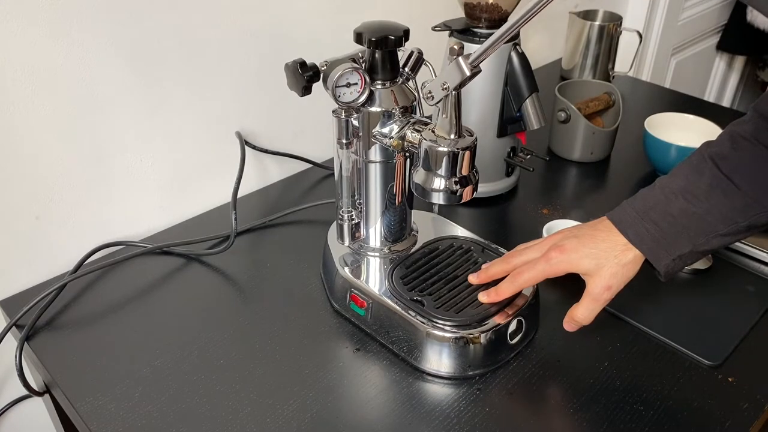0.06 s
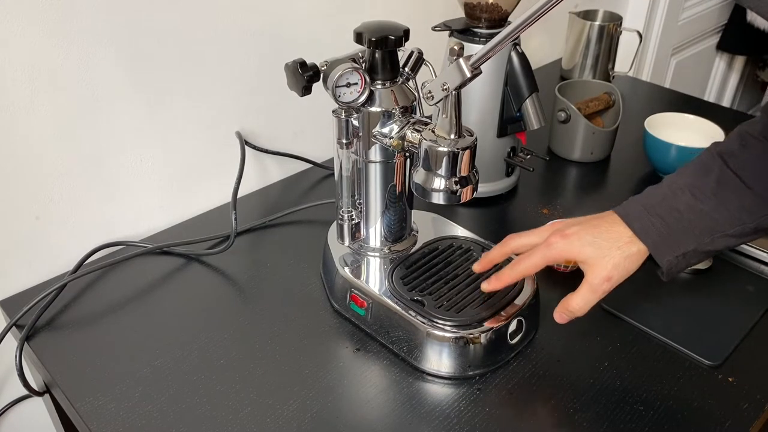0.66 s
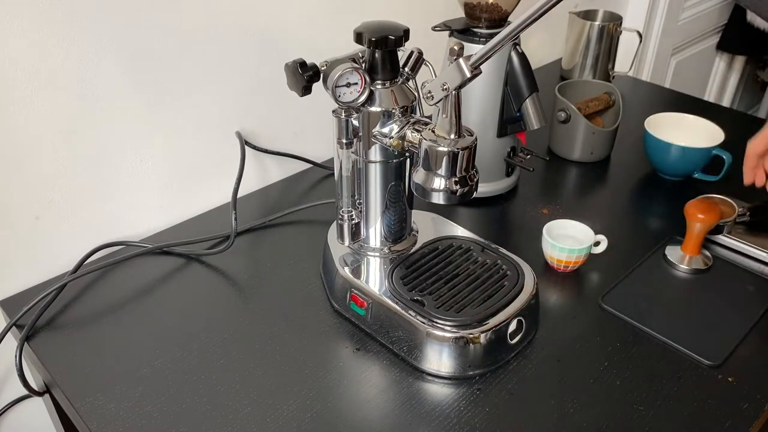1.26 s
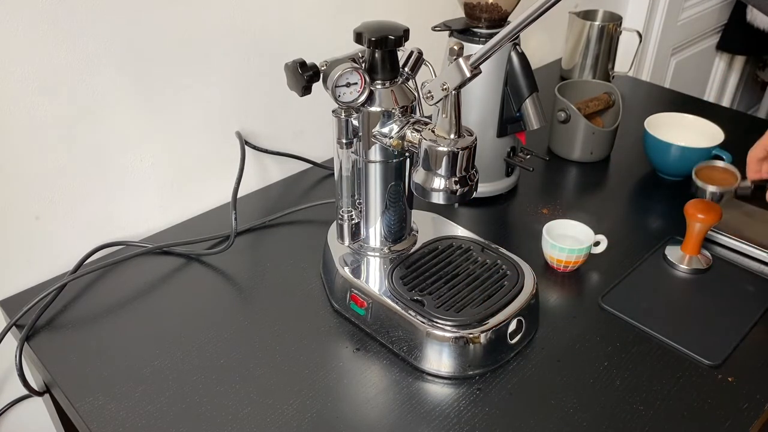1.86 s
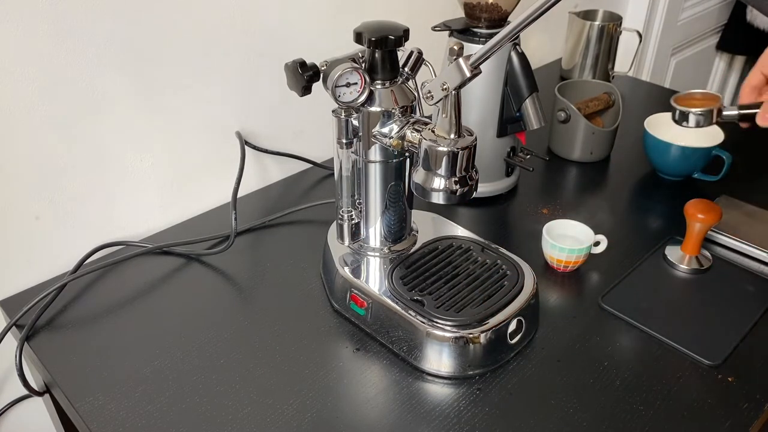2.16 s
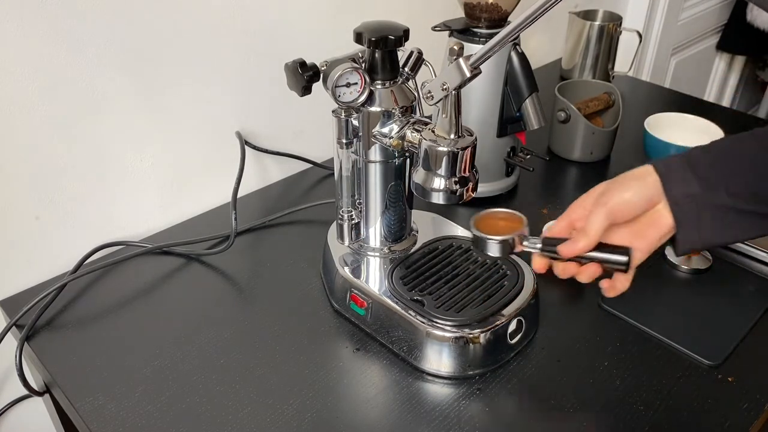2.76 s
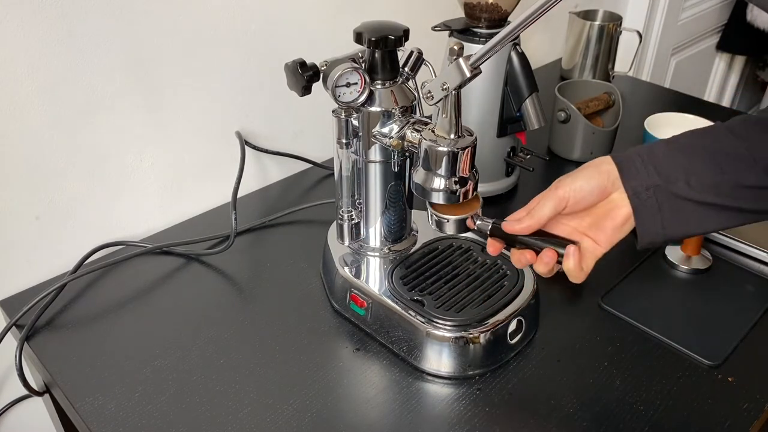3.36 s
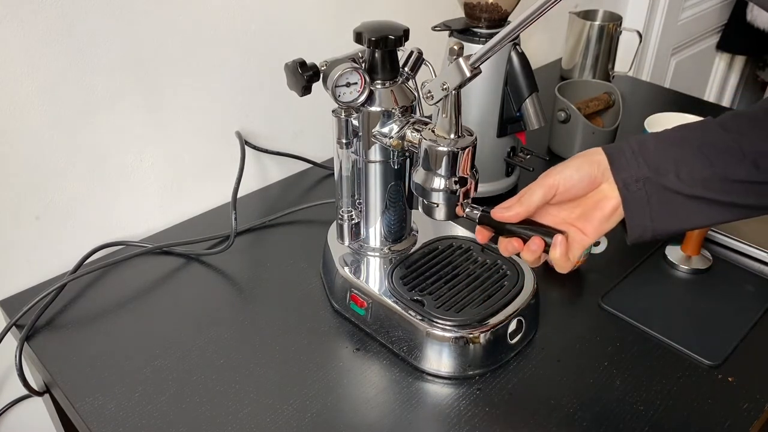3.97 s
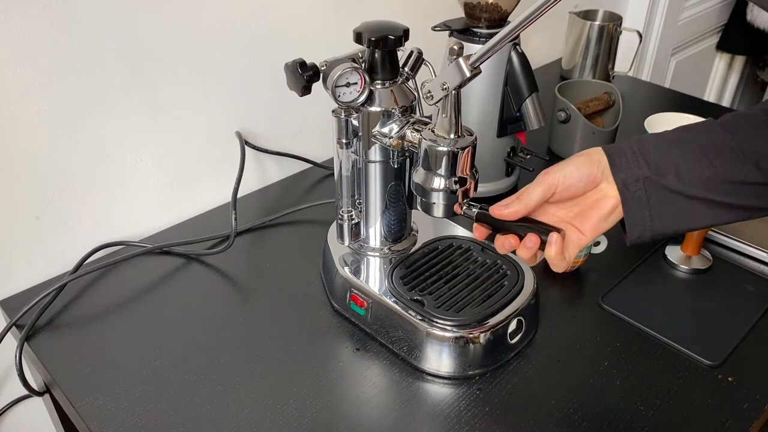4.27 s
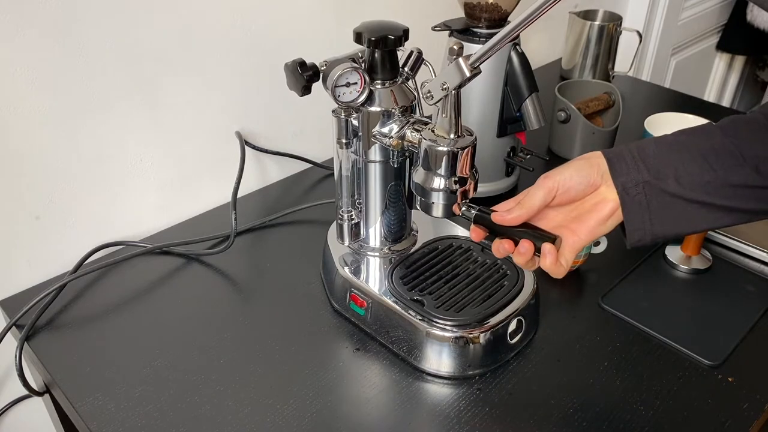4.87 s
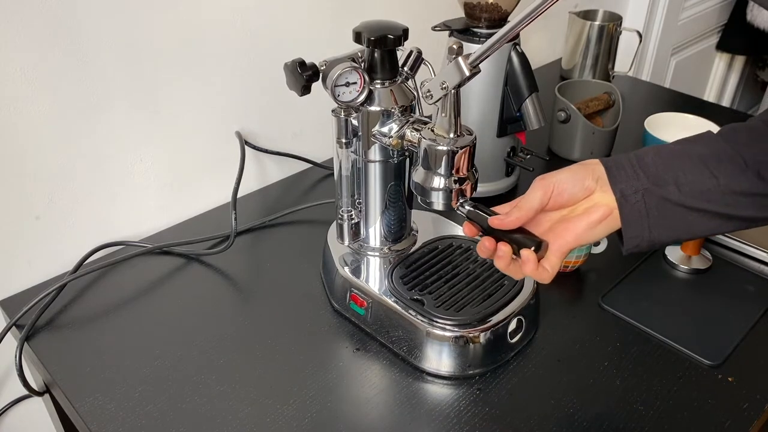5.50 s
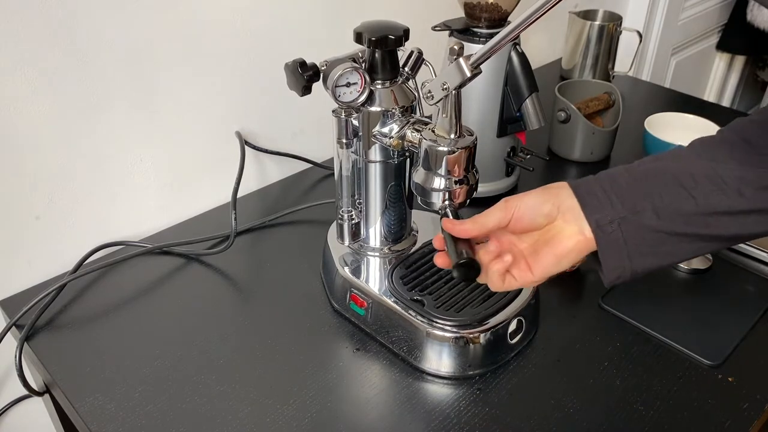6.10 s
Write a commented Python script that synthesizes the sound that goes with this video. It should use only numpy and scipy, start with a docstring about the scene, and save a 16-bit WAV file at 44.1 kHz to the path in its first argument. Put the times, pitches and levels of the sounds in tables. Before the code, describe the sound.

The low hush of a small quiet room runs throughout, with the stereo microphone close to a lever espresso machine. In the first 0.6 seconds its loose drip grate rattles softly several times as a hand leaves it. A pause follows, with a few very faint ticks between 2 and 2.7 seconds.

At 3.5 seconds a metal portafilter taps the group head. It scrapes briefly along the rim and clacks sharply into the slots at 4 seconds, with a low thump from the machine. Around 4.3 seconds it bumps dully against the rubber gasket. At 5 seconds comes the loudest moment, a quick cluster of hard clacks as it is twisted tight; the metal rings briefly, damped by the hand, and the machine booms on its table. A few lighter metal clicks follow from 5.5 to 5.7 seconds, then the room hush remains until about 6 seconds.

```python
"""A loose drip grate rattles as a hand leaves it, over the low hush of a small quiet room.
After a few light ticks, a portafilter taps the group head of the lever espresso machine, scrapes
along its rim, clacks into the slots and is twisted tight, bumping dully on the rubber gasket.
Hard blows ring the metal and shake the machine on its table. The stereo microphone is close by."""
import sys
import numpy as np
from scipy import signal
from scipy.fft import rfft, irfft, next_fast_len
from scipy.io import wavfile
from scipy.ndimage import uniform_filter1d

SR = 44100
rng = np.random.default_rng(int(sys.argv[2]) if len(sys.argv) > 2 else 0)


def inscribe(sig):
    """Save sig as 16-bit PCM at rate SR to the path in sys.argv[1].

    A 1-D sig is mono; a 2-D sig holds one channel per row.
    Samples are clipped to [-1, 1] before scaling.
    """
    pcm = np.round(np.clip(np.atleast_2d(sig).T, -1, 1) * 32767)
    wavfile.write(sys.argv[1], SR, pcm.astype(np.int16))


N = 270774

# spectrum of the building's rumble: frequency_hz, gain_db
HUSH_TONE = [(18, -35.5), (30, -9), (59, -0.5), (86, -7.5), (118, -8), (145, -13.5), (170, -16), (404, -26),
             (499, -27.5), (988, -35.5), (6720, -43), (8980, -46.5), (11100, -47), (16000, -59)]
# fingers rattle the drip grate: start_s, level_db, brightness_hz, spot_resonance_hz, t60_s
GRATE_RATTLES = [(.001, -46, 8500, 3650, 0.17), (.194, -64, 4830, 1400, 0.13),
                 (.323, -52.5, 7500, 3480, 0.1), (.331, -51, 2500, 1300, 0.058),
                 (0.442, -54.5, 3400, 1910, 0.048), (.563, -63.5, 5070, 3500, 0.12),
                 (.579, -55, 4260, 3200, 0.057)]
# modes of the grate's bars: pitch_hz, level_db, t60_s
BAR_MODES = [(1400, 2, 0.14), (1750, -3, 0.1), (2730, 5, 0.071), (3400, -8, 0.15), (3800, -16, 0.1)]
# spectrum of a sharp tap on the grate: frequency_hz, gain_db
GRATE_TONE = [(60, -18.5), (200, -6.5), (380, -6), (700, -5), (950, -6.5), (1400, -2.5), (1900, 0),
              (2600, -2), (3600, -2.5), (5500, -2), (12000, -2.5)]
# ticks of fingertips and of the basket in its holder: start_s, level_db, low_cut_hz
LIGHT_TICKS = [(.217, -65, 6400), (1.971, -73, 2400), (2.402, -59, 2700), (2.628, -61.5, 2430),
               (2.668, -70, 2320)]
# blows that shake the machine: start_s, level_db, contact_s
SHOVES = [(0.613, -54, 0.014), (3.977, -35.5, 0.012), (4.268, -51.5, 0.0011), (4.989, -47.5, .0015),
          (5.019, -29.5, .0009), (5.289, -57, 0.0034)]
# modes of the machine on its table: pitch_hz, level_db, t60_s
MACHINE_MODES = [(60.3, -15.5, 0.72), (86, -8.5, 0.13), (99.4, -17, 1), (118.5, 1.5, 0.25),
                 (137.1, -6.5, 0.19), (198.6, -8.5, 0.17), (230.6, -14, 0.4), (283, 4, 0.2),
                 (365.7, -3.5, 0.28), (434, -14.5, 0.31)]
# portafilter meets group head: start_s, level_db, brightness_hz, weight_db, spot_resonance_hz, t60_s
HEAD_CONTACTS = [(3.523, -39.5, 2400, 0.5, 2000, 0.043), (3.903, -49, 6000, -3, 2100, .04),
                 (3.953, -29.5, 13000, 5.5, 1290, .014), (3.9725, -19.5, 6150, 2, 5180, .05),
                 (4.254, -48.5, 4000, 12.5, 4900, 0.035), (4.267, -47, 7490, 21, 5000, 0.03),
                 (4.966, -45.5, 2400, -4, 1894, .045), (4.984, -36.5, 5500, -0.5, 1300, 0.07),
                 (4.997, -24.5, 1900, -4.5, 1950, .03), (5.015, -26.5, 8000, 0, 7400, .026),
                 (5.018, -11.5, 6584, -1, 1280, .036), (5.106, -29, 4700, -6.5, 1810, 0.033),
                 (5.512, -44.5, 3270, 1, 2730, 0.049), (5.54, -45, 5500, -0.5, 4300, 0.03),
                 (5.667, -33.5, 3600, -5.5, 3950, 0.032), (5.692, -39, 2300, 3.5, 2650, 0.057)]
# modes of portafilter and group head: pitch_hz, level_db, t60_s
METAL_MODES = [(602, 1.5, 0.08), (698, -2, 0.15), (940, -8, 0.22), (964, -4.5, .24), (1210, -1, .17),
               (1405, -2, 0.11), (1685, -5.5, 0.18), (1880, -8, 0.18), (1926, -1, 0.16), (2555, -4, 0.11),
               (2708, -2, .16), (2815, -4.5, 0.17), (3276, -7.5, 0.22), (4400, -2.5, .16), (4700, -3, .2),
               (5500, -8, 0.12), (6150, -4, .17), (6880, -7.5, 0.12), (7420, -2, 0.067), (8070, -5.5, .17)]
# broad radiation of the brass cup and group head: frequency_hz, gain_db
BRASS_TONE = [(380, 0.5), (520, -4), (680, 0.5), (1020, -2.5), (1250, 2.5), (1950, 0), (2300, -1),
              (2720, 1.5), (3100, -2), (3600, -1), (5450, -1), (5900, -2.5), (6500, 1.5), (7800, 1),
              (9500, -2), (13000, -3)]
# lugs slide on the rim, lastly the hand on the handle: start_s, length_s, final_level_db, swell_db
SLIDES = [(3.843, .062, -72.5, 17.5), (3.915, .058, -58, 5.5), (4.986, 0.045, -45.5, -1.5),
          (5.804, .3, -86.5, 0)]
# spectrum of the sliding surfaces: frequency_hz, gain_db
SCRAPE_TONE = [(100, -16.5), (300, 1), (1800, -2.5), (3500, -9.5), (7500, -15.5), (10000, -27.5),
               (16000, -26)]
# the basket bumps the gasket: start_s, level_db, pitch_hz, t60_s
GASKET_BUMPS = [(4.257, -40, 243.8, 0.056), (4.2707, -27.5, 244, 0.041), (4.313, -42, 255, 0.077)]
# reverberation of the small room: frequency_hz, t60_s
ROOM_DECAY = [(80, 0.63), (260, 0.6), (700, 0.37), (1800, 0.3), (5000, 0.36), (8000, .25), (13000, 0.27)]
# diffuse sound at the microphone's two ports: frequency_hz, left_right_correlation
PORT_LIKENESS = [(100, 0.95), (300, .75), (900, 0.27), (2500, 1), (5500, 0.16), (7200, 1), (15000, 1)]
# level balance of the two channels: frequency_hz, left_minus_right_db
STEREO_BALANCE = [(120, 1), (280, 1), (650, 4), (1300, 0.5), (5500, 3.5), (9000, -0.5)]
# left-right phase shift from stereo processing: frequency_hz, left_lead_rad
STEREO_PHASE = [(100, 0.33), (900, 1), (2500, 1.24), (4500, 0), (6800, 1), (8000, -1.34), (9000, -3.5),
                (10600, -5), (11900, -7.5), (13300, -10.5), (14800, -13)]
# response of the microphone: frequency_hz, gain_db
MIC_TONE = [(30, 2.5), (1000, 3.5), (1900, 1), (2300, 1), (2750, 0.5), (3200, 0), (6000, 0), (7600, 1),
            (8600, 0.5), (12500, 1.5), (14400, -0.5), (15500, -5), (16200, -21.5)]


def amp(db):
    """Decibels to amplitude."""
    return 10 ** (np.asarray(db) / 20)


def unit_rms(x):
    """Scale x to an RMS of one."""
    return x / np.sqrt(np.mean(x ** 2) + 1e-20)


def along(points, hz):
    """Read a curve of (frequency_hz, value) points on a log frequency axis."""
    frequencies, values = np.transpose(points)
    return np.interp(np.log(hz + 1), np.log(frequencies), values)


def filtered(x, response):
    """Filter x by a complex function of frequency."""
    n = x.shape[-1]
    size = next_fast_len(n + 8192)
    return irfft(rfft(x, size) * response(np.fft.rfftfreq(size, 1 / SR)), size)[..., :n]


def coloured(x, points):
    """Causal, minimum-phase filter through (frequency_hz, gain_db) points."""
    n = x.shape[-1]
    size = next_fast_len(n // 2 + 4096) * 2
    cepstrum = irfft(np.log(amp(along(points, np.fft.rfftfreq(size, 1 / SR)))))
    cepstrum[1:size // 2] *= 2
    cepstrum[size // 2 + 1:] = 0
    return irfft(rfft(x, size) * np.exp(rfft(cepstrum)))[..., :n]


def evened(x, width_hz=600):
    """Spread a burst's energy evenly over frequency, as in a dense crowd of modes."""
    n = x.shape[-1]
    size = next_fast_len(n + 4096)
    spectrum = rfft(x, size)
    power = np.abs(spectrum) ** 2
    local_power = np.abs(uniform_filter1d(power, max(1, int(width_hz * size / SR)), axis=-1)) + 1e-20
    return irfft(spectrum * np.sqrt(power.mean(axis=-1, keepdims=True) / local_power), size)[..., :n]


def diffuse(size):
    """Stereo noise as it reaches the microphone's two ports from all sides."""
    def mid_side_gains(hz):
        angle = np.arccos(np.clip(along(PORT_LIKENESS, hz), -1, 1)) / 2
        return np.array([np.cos(angle), np.sin(angle)])
    mid, side = filtered(rng.standard_normal((2, size)), mid_side_gains)
    return np.array([mid + side, mid - side])


def in_room(x, wet_db, table_db=-8, table_t60=0.04, build_up_s=0.0036):
    """Close to the source: direct sound, quick reflections off table and wall, then a darkening tail."""
    hz, frame_s, spectra = signal.stft(diffuse(SR // 2), SR, nperseg=256)
    decay = amp(-60 * frame_s / along(ROOM_DECAY, hz)[:, None])
    tail = signal.istft(spectra * decay, SR, nperseg=256)[1]
    t = np.arange(tail.shape[1]) / SR
    early = tail * amp(-60 * t / table_t60) * (1 - np.exp(-t / 0.00019))
    late = tail * (1 - np.exp(-(t / build_up_s) ** 2))
    near = evened((t == 0) + amp(table_db) * early / np.linalg.norm(early[0]))
    paths = near + amp(wet_db) * late / np.linalg.norm(late[0])
    return signal.fftconvolve(x[None], paths, axes=1)[:, :len(x)]


def add(track, start_s, sound):
    """Mix a sound into the track from start_s."""
    part = track[..., max(0, round(start_s * SR)):][..., :sound.shape[-1]]
    part += sound[..., :part.shape[-1]]


def ring(modes, t, scatter_db, waver=0):
    """Struck modes decay; their phases wander by waver (radians per root second)."""
    hz, db, t60 = np.transpose(modes)[:, :, None]
    strength = amp(db + scatter_db * rng.standard_normal(hz.shape)) * rng.choice([-1, 1], hz.shape)
    drift = waver * np.cumsum(rng.standard_normal((len(modes), len(t))), axis=1) / np.sqrt(SR)
    return np.sum(strength * amp(-60 * t / t60) * np.sin(2 * np.pi * hz * t + drift), axis=0)


def clack(t, t60, crack, crack_t60, attack_s=0.00045):
    """A noise burst: a brief crack as the surfaces meet, then a crowd of heavily damped modes."""
    decay = amp(-60 * t / t60) + crack * amp(-60 * t / crack_t60)
    attack = 1 - np.exp(-t / attack_s)
    return evened(rng.standard_normal(len(t)) * decay * attack)


def contact_tone(bright_hz, spot_hz, spot_db, weight_db=0, weight_hz=950, spot_octaves=0.14):
    """Tone curve: a soft contact loses treble, a heavy one gains body, the struck spot resonates."""
    hz = np.geomspace(30, 20000, 200)
    treble = -10 * np.log10(1 + (hz / bright_hz) ** 4)
    body = weight_db / (1 + (hz / weight_hz) ** 4)
    spot = spot_db * np.exp(-0.5 * (np.log2(hz / spot_hz) / spot_octaves) ** 2)
    return np.column_stack([hz, treble + body + spot])


def hush(rumble_db=-69.65, lean_left_db=0.07, hiss_db=-97):
    """Room tone: the building rumbles from all sides under the microphone's own faint hiss."""
    rumble = unit_rms(filtered(diffuse(N), lambda hz: amp(along(HUSH_TONE, hz))))
    hiss = rng.standard_normal((2, N))
    return amp(rumble_db) * rumble * amp([[lean_left_db], [-lean_left_db]]) + amp(hiss_db) * hiss


def grate(gain_db=0.5, ring_db=-26):
    """The loose grate rattles in its tray as the fingers lift; its bars ring briefly."""
    out, t = np.zeros((2, N)), np.arange(SR // 4) / SR
    for start_s, db, bright_hz, spot_hz, t60 in GRATE_RATTLES:
        bars = ring(BAR_MODES, t, scatter_db=3)
        rattle = clack(t, t60, crack=0.82, crack_t60=0.008) + amp(ring_db) * bars
        rattle = coloured(rattle, contact_tone(bright_hz, spot_hz, spot_db=6))
        add(out, start_s, amp(db + gain_db) * in_room(rattle, wet_db=-9.5, table_db=-8))
    return coloured(out, GRATE_TONE)


def low_cut(x, hz, order):
    """A small part radiates little below hz."""
    return signal.sosfilt(signal.butter(order, min(hz, SR / 3), 'high', fs=SR, output='sos'), x)


def ticks(gain_db=2.5, band_ratio=3.6):
    """Light touches give thin clicks, too weak to ring anything."""
    out, t = np.zeros((2, N)), np.arange(SR // 4) / SR
    for start_s, db, low_hz in LIGHT_TICKS:
        tick = low_cut(clack(t, t60=0.015, crack=1, crack_t60=0.014), low_hz, order=6)
        tick = coloured(tick, contact_tone(band_ratio * low_hz, low_hz, spot_db=5.5))
        add(out, start_s, amp(db + gain_db) * in_room(tick, wet_db=-6, table_db=-15.5))
    return out


def machine(rise_s=0.017):
    """Shoves set the machine booming on the table; a long soft contact favours the lowest modes."""
    out, t = np.zeros((2, N)), np.arange(SR) / SR
    for start_s, db, contact_s in SHOVES:
        modes = [(hz, mode_db - 20 * np.log10(1 + (hz * contact_s) ** 2), t60)
                 for hz, mode_db, t60 in MACHINE_MODES]
        boom = ring(modes, t, scatter_db=0.5, waver=11) * (1 - np.exp(-t / rise_s))
        add(out, start_s, amp(db) * in_room(boom, wet_db=-17, table_db=-23))
    return out


def portafilter(gain_db=-1, ring_db=-30):
    """Each contact with the group head clacks and rings the same metal, damped by the hand."""
    out, t = np.zeros((2, N)), np.arange(SR // 3) / SR
    for start_s, db, bright_hz, weight_db, spot_hz, t60 in HEAD_CONTACTS:
        chatter = clack(t, t60, crack=0.42, crack_t60=0.0072)
        metal = amp(ring_db) * ring(METAL_MODES, t, scatter_db=0, waver=9.6)
        tone = contact_tone(bright_hz, spot_hz, spot_db=5, weight_db=weight_db)
        blow = coloured(chatter + metal, tone)
        add(out, start_s, amp(db + gain_db) * in_room(blow, wet_db=-7, table_db=-6.5))
    return coloured(low_cut(out, hz=370, order=4), BRASS_TONE)


def scrape(slips_per_s=900, slip_t60=0.0017, edge_s=0.01):
    """Sliding surfaces grind in many tiny slips, as loud as the pressure that holds them together."""
    t, pressure = np.arange(N) / SR, np.zeros(N)
    for start_s, length_s, final_db, swell_db in SLIDES:
        progress = np.clip((t - start_s) / length_s, 0, 1)
        touching = np.clip(np.minimum(t - start_s, start_s + length_s - t) / edge_s + 0.5, 0, 1)
        pressure += touching * amp(final_db - swell_db * (1 - progress))
    slips = (rng.random(N) < slips_per_s / SR) * rng.exponential(size=N)
    energy_decay = amp(-120 * t[:SR // 50] / slip_t60)
    grit = np.sqrt(np.abs(signal.fftconvolve(slips, energy_decay)[:N]))
    rub = unit_rms(coloured(grit * rng.standard_normal(N), SCRAPE_TONE))
    return in_room(rub * pressure, wet_db=-2)


def gasket(rise_s=0.0024, overtone_ratio=1.8, overtone_db=-12):
    """The basket meets rubber: a few cycles of a dull bump."""
    out, t = np.zeros((2, N)), np.arange(SR // 2) / SR
    for start_s, db, hz, t60 in GASKET_BUMPS:
        phase = 2 * np.pi * hz * t
        swing = np.sin(phase) + amp(overtone_db) * np.sin(overtone_ratio * phase)
        bump = swing * amp(-60 * t / t60) * (1 - np.exp(-t / rise_s))
        add(out, start_s, amp(db) * in_room(bump, wet_db=-12, table_db=-16.5))
    return out


def scene():
    """All the handling sounds, heard from beside the machine, over the hush of the room."""
    return grate() + ticks() + portafilter() + machine() + gasket() + scrape() + hush()


def record(dry, top_hz=16200):
    """The microphone colours the sound; a stereo-processing phase shift smears and widens the treble."""
    def response(hz):
        half = np.array([[0.5], [-0.5]])  # left and right move half each, in opposite directions
        balance = amp(half * along(STEREO_BALANCE, hz))
        phase_shift = np.exp(1j * half * along(STEREO_PHASE, hz))
        return balance * phase_shift * amp(along(MIC_TONE, hz)) * (hz < top_hz)
    return filtered(dry, response)


dry = scene()
out = record(dry)
inscribe(out)
```